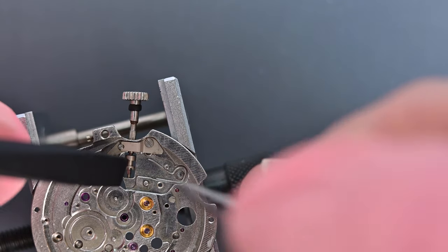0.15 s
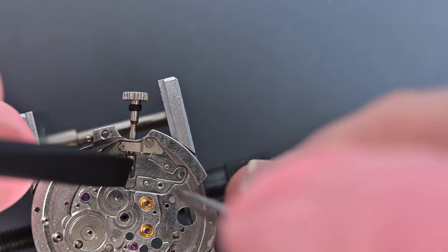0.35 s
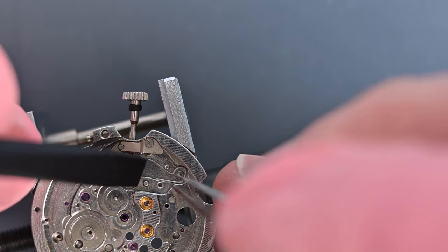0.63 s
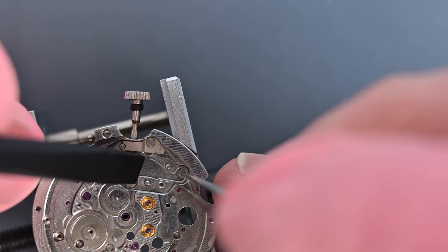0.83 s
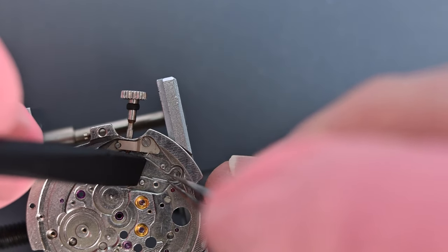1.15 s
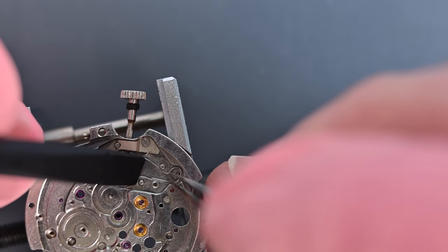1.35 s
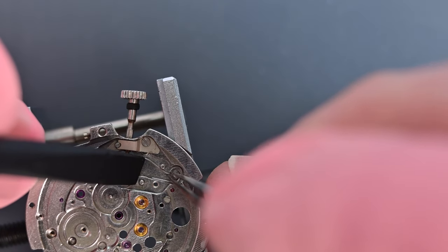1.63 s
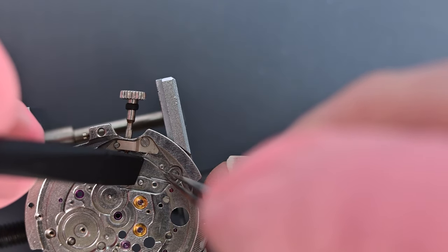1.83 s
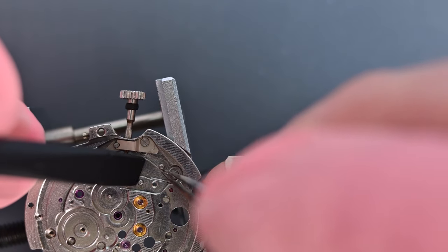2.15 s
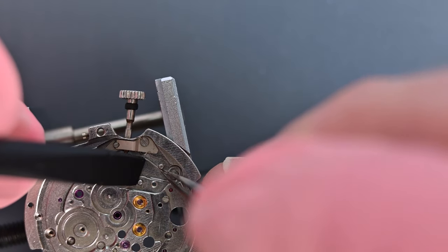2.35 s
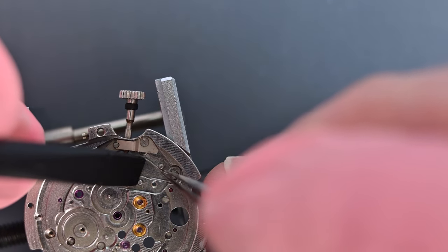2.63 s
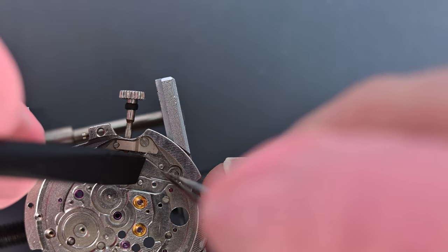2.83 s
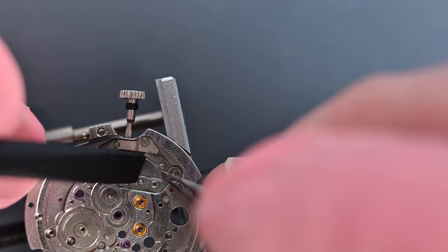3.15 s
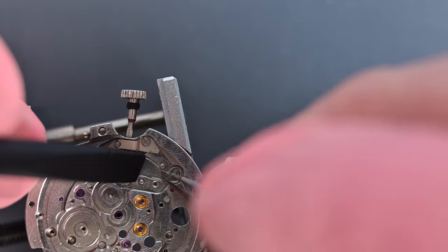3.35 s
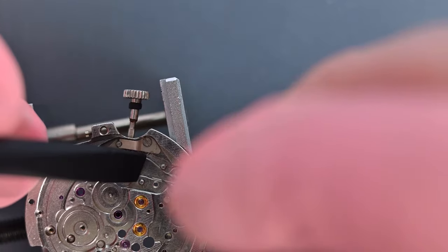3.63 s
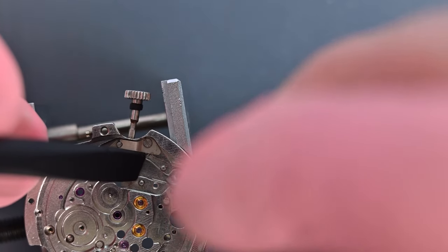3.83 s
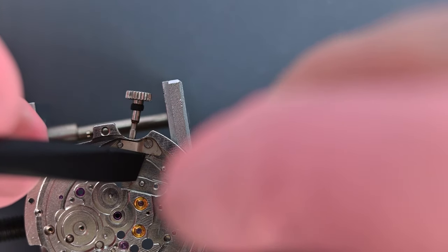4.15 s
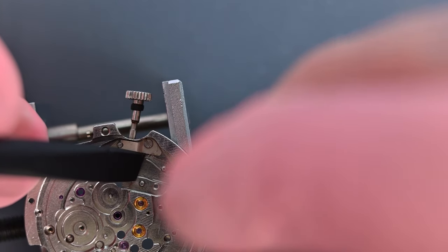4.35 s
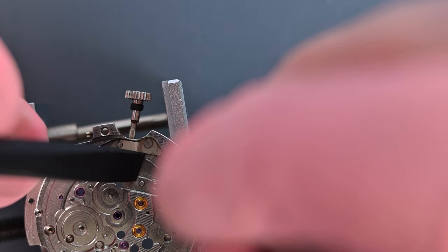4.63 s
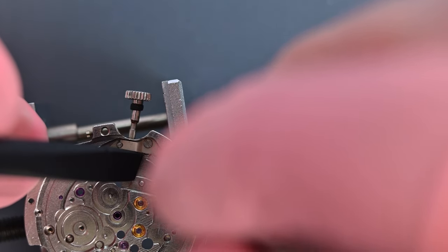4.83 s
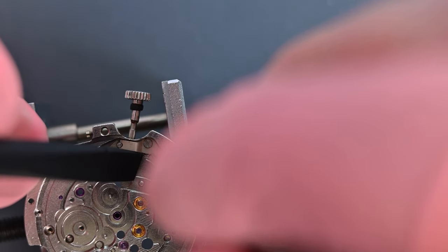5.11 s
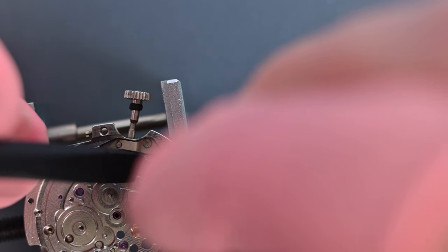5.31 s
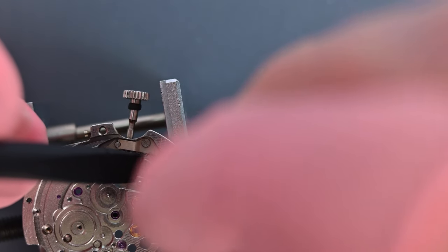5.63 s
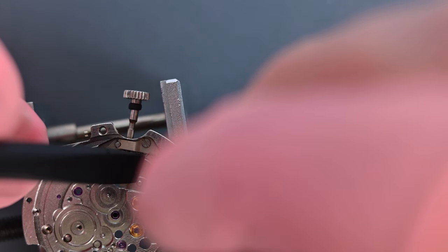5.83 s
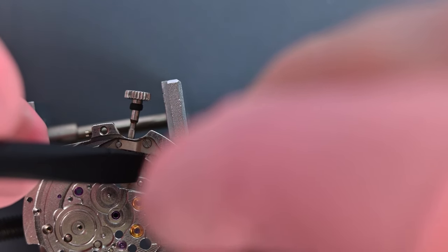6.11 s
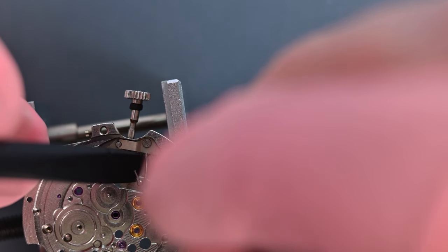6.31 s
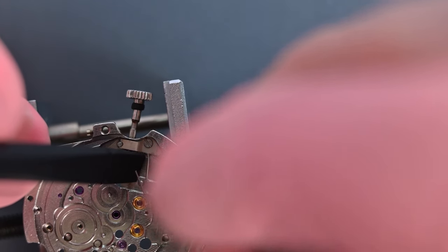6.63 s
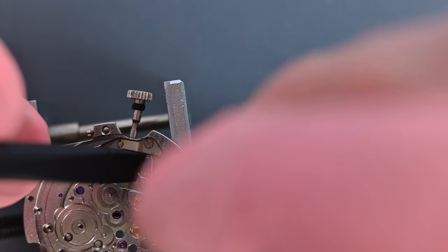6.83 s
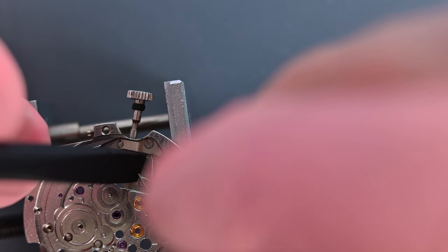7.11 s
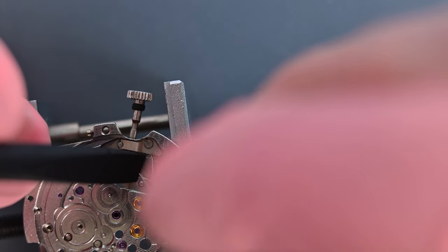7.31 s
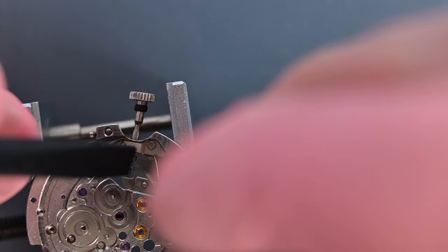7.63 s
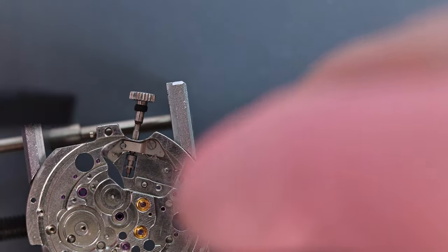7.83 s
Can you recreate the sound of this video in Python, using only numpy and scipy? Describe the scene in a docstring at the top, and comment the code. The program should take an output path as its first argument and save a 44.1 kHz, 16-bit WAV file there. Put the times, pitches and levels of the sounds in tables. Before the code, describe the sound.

Close stereo view of delicate watch work in a small quiet room. Thin steel ticks come first, then irregular soft knocks through the clamp and bench. A bright click lands just before three seconds, a short gritty scrape at three and a half, and the sharpest click past six. A distant low engine drone, room rumble and soft hiss continue throughout.

```python
"""Steel tweezers tick against the small metal parts of a watch movement clamped on a workbench.
Pushes knock dully through clamp and bench, and once the clamp scrapes along: struck modes and rubbed noise.
Fingers and tool rustle in shaped noise; the room answers with a decaying noise tail.
Behind lie a distant engine's drone (sines at shaft orders), room rumble and microphone hiss (shaped noise)."""
import sys
import numpy as np
from scipy import signal
from scipy.fft import rfft, irfft, next_fast_len
from scipy.io import wavfile
from scipy.ndimage import map_coordinates

SR = 44100
rng = np.random.default_rng(int(sys.argv[2]) if len(sys.argv) > 2 else 0)


def volts_from_db(level):
    """Convert decibel levels to linear amplitude ratios."""
    exponent = np.asarray(level, float) / 20
    return 10 ** exponent


def int16_out(signal):
    """Quantize to a 16-bit WAV file."""
    q = np.round(np.clip(np.atleast_2d(signal).T, -1, 1) * 32767)
    wavfile.write(sys.argv[1], SR, q.astype(np.int16))


N = 351036

# microphone hiss spectrum: freq_hz, relative_db_per_hz
HISS_SPECTRUM = [(180, -27), (300, -2.5), (584, -6), (689, -5.5), (762, -7.5), (1010, -8), (2140, -17),
                 (10900, -28), (15000, -27), (16000, -28)]
# room rumble spectrum: freq_hz, relative_db_per_hz
RUMBLE_SPECTRUM = [(12, -43), (20, -12), (60, -2), (134, -2), (173, -12), (214, -4.5), (235, -6),
                   (280, -19), (372, -17.5), (414, -26.5), (500, -25.5), (650, -60), (1100, -120)]
# left-right correlation of the noises: freq_hz, correlation (-1..1)
STEREO_LIKENESS = [(60, 0.84), (180, 0.95), (550, 0.69), (1650, 0.065), (4970, -0.16), (15000, -0.052)]
# distant engine: time_s, shaft_hz, shaft_tone_db, firing_tone_db, firing_octave_db
ENGINE_COURSE = [(0, 37.32, -52, -62.5, -64.5), (.82, 37, -46, -57, -61), (1.1, 36.74, -50.5, -56.5, -57.5),
                 (1.57, 36.14, -53.5, -50, -58), (2.3, 35.98, -49, -46, -59),
                 (2.8, 36.17, -57.5, -48, -51.5), (3.65, 35.43, -56, -48, -44),
                 (4.5, 34.53, -59.5, -43.5, -49.5), (4.8, 35.03, -65, -56, -44),
                 (4.95, 35.14, -54, -48.5, -60.5), (5.32, 35.5, -53.5, -47, -51),
                 (5.68, 36.2, -56.5, -43.5, -53), (5.9, 36.24, -55.5, -57.5, -59), (6.2, 37, -61, -49, -63),
                 (6.45, 37.1, -66, -50, -56), (6.66, 37.1, -65, -61, -63),
                 (6.83, 36.97, -58.5, -54.5, -57.5), (7.96, 38, -59, -62, -62.5)]
# shaft orders heard: multiple_of_shaft_hz
SHAFT_ORDERS = (1, 2, 3, 4, 6)
# slow independent wander of each order: waver_db
ORDER_WAVER_DB = (2.2, 1.5, 4.5, 1.5, 2.5)
# fingers and tool rubbing: time_s, level_db
RUSTLE_LEVEL = [(0.8, -78), (1.23, -66.5), (1.61, -78), (1.9, -81), (2.05, -70), (2.2, -85), (2.36, -67.5),
                (2.71, -94), (2.93, -72), (3.39, -68), (3.51, -51.5), (3.73, -64), (4.39, -75), (4.75, -64),
                (5.06, -79), (6.2, -70.5), (7.3, -94), (7.47, -71), (7.6, -86)]
# rubbing spectrum: freq_hz, relative_db_per_hz
RUB_SPECTRUM = [(300, -14), (500, 4), (1200, -7), (3000, -15.5), (7000, -26.5), (15000, -40)]
# clamp dragged over the bench: time_s, body_level_db
SCRAPE_LEVEL = [(3.41, -47), (3.452, -55), (3.47, -66), (3.516, -41), (3.622, -32.5), (3.678, -63),
                (3.71, -71)]
# grit rasp spectrum: freq_hz, relative_db_per_hz
GRIT_SPECTRUM = [(150, -36), (250, 1.5), (347, -11), (420, -39), (516, 10.5), (768, 2.5), (945, 8),
                 (1900, -18.5), (2490, -17.5), (3200, -26), (15500, -60)]
# clamp and bench modes: freq_hz, relative_db, t60_s, left_lead_rad, left_minus_right_db
CLAMP_MODES = [(514, -1, 0.015, -0.42, 8), (564, 2.5, 0.029, 0.34, -2), (678.5, 3.5, 0.02, 0.33, 0.5),
               (840, -6, 0.036, 0.68, 0.5), (926, 2, 0.016, -0.32, -0.5), (1001, -2.5, 0.017, 0.24, -1.5),
               (1115, -11, 0.024, 0.96, -13), (1248, -17.5, 0.03, -1.3, 1.5), (1560, 16.5, 0.011, -1, -8.5),
               (1900, 7, 0.019, 1, -6), (2333, 10, 0.016, -1.2, 1), (2630, -5.5, 0.015, -2.7, -22),
               (3256, 13, 0.0046, 1, -3.5), (4160, 19, 0.0017, 1, -3)]
# pushes felt by the clamp: start_s, lower_modes_peak_db, upper_re_lower_db
PUSHES = [(0.879, -38, -14.5), (0.934, -52.5, -8), (1.055, -50, -20), (1.078, -34, -11), (1.135, -45, -12),
          (1.189, -35, -20), (1.245, -46.5, -1.5), (1.28, -48, -3), (1.29, -32.5, -6), (1.362, -52.5, -11),
          (1.425, -48, -18), (1.593, -40, -13.5), (1.697, -46.5, -27), (1.78, -48.5, -25),
          (1.928, -54.5, -22), (2.014, -56.5, 0.5), (2.05, -51, -21), (2.108, -51, -13),
          (2.316, -49.5, 0.5), (2.338, -47.5, -17), (2.355, -49, -24), (2.39, -51, -18), (2.547, -44, -12),
          (2.844, -39.5, -9.5), (2.916, -46.5, -11), (2.965, -41, -20), (3.05, -47.5, -25),
          (3.129, -38, 0.5), (3.191, -38, -21), (3.216, -50, -17), (3.289, -36, -13), (3.347, -34.5, -17.5),
          (3.399, -47, -1.5), (3.415, -42.5, -25), (3.447, -34.5, -12.5), (3.495, -29.5, -31),
          (3.722, -45, -27), (3.779, -44, -11), (3.818, -48, -22), (3.916, -30.5, -17), (4.082, -40.5, -39),
          (4.172, -33, -21), (4.206, -45.5, -28), (4.306, -45, -18), (4.375, -30.5, -16),
          (4.404, -29.5, -13), (4.602, -33, -30), (4.651, -30, -13.5), (4.869, -48, -31), (5.115, -37, -21),
          (5.241, -51.5, -15), (5.369, -42, -2), (5.773, -42.5, -18), (5.979, -32.5, -10.5),
          (6.146, -41, -14), (6.237, -45.5, -2.5), (6.263, -48, -29), (6.442, -40.5, -19),
          (6.592, -43, -13), (6.685, -45, -34), (6.969, -46, -9), (7.242, -49, -18), (7.382, -34.5, -24),
          (7.458, -52.5, -28), (7.62, -39, -18), (7.751, -56.5, -2.5)]
# tweezers and plate modes: freq_hz, relative_db, t60_s, left_lead_rad, left_minus_right_db
STEEL_MODES = [(2300, -6, .012, 1, -1), (3850, -7, .009, .8, 6), (4190, -4, .014, .4, 1),
               (4800, -7, .007, 0, 0), (5500, -3, .008, .2, 2), (5900, 0, .012, 0, 0),
               (7000, -12, .006, .3, 0), (7900, -6, .01, 1.2, -2), (8450, -1, .01, 1.3, -3),
               (8800, -3, .012, 1.6, -3), (10400, -6, .007, 2.7, -4), (11550, 0, .014, 3.7, 0),
               (13600, -10, .008, 2.4, 2), (14300, -5, .012, 2.6, 3), (14850, -3, .01, 2.6, 1),
               (15400, 1, .01, 2.8, -1)]
# steel on steel: start_s, middle_modes_peak_db, lower_re_middle_db, highest_re_middle_db
TOUCHES = [(0.0034, -51.5, 6, 9), (0.3085, -55.5, -11, -9), (0.4499, -56.5, -5.5, -13), (0.492, -66, 3, 10),
           (0.673, -61, -5, -13), (1.1362, -63, 1, 4), (1.2456, -64, -11, -9), (1.2896, -67, -8, -11),
           (1.413, -65, -3, 6), (1.592, -65, -6, -1), (2.8435, -40, 6, 6), (3.12, -62, -8, -5),
           (3.1289, -50, -15, -6), (3.715, -65, 1, -9), (3.788, -60.5, -1, 11), (3.8187, -64, 7, 6),
           (3.916, -65, -5, -6), (4.374, -66, 6, -8), (4.4061, -57.5, -2, -11), (4.6002, -59, 9, 6),
           (4.6029, -53, 3, -6), (4.615, -67, 9, -3), (5.0918, -69, 10, -4), (5.3664, -61, 7.5, -10),
           (5.3765, -67, 7, 0), (5.9793, -67, 2, -3), (6.2364, -31, 4, -1), (6.2454, -58, -21, -3),
           (6.58, -66, -10.5, 1), (7.7462, -56, -1, 1), (7.754, -63, 9, 0), (7.7585, -46.5, -5, 5),
           (7.761, -52.5, 14, 3)]
# room decay: freq_hz, t60_s
ROOM_DECAY = [(300, 0.11), (2000, 0.32), (15000, 0.42)]

CLAMP_SPLIT_HZ = 1500  # lower modes below, upper modes above
SILENT_DB = -120


def unit(x):
    """Scaled to rms 1."""
    return x / np.sqrt(np.mean(x ** 2) + 1e-20)


def along(points, hz):
    """Interpolates (Hz, value) points on a log frequency axis."""
    f, v = np.transpose(points)
    return np.interp(np.log(hz + 1), np.log(f + 1), v)


def curves(rows, outside=None):
    """One value per sample for each column after the time."""
    time_s, *columns = np.transpose(rows)
    t = np.arange(N) / SR
    return [np.interp(t, time_s, column, outside, outside) for column in columns]


def swell(db):
    """A level curve about its mean."""
    return db - db.mean()


def wobble(knots_per_s):
    """Smooth random curve drawn from normal-distributed knots."""
    knots = rng.standard_normal(int(N * knots_per_s / SR) + 4)
    return map_coordinates(knots, [np.arange(N) * knots_per_s / SR])


def filtered(x, response):
    """x times a response of frequency, zero-padded."""
    m = next_fast_len(x.shape[-1] + 8192)
    spectrum = rfft(x, m) * response(np.fft.rfftfreq(m, 1 / SR))
    return irfft(spectrum, m)[..., :x.shape[-1]]


def rush(spectrum):
    """Stereo noise of rms 1; the mid/side balance sets the left-right correlation at each frequency."""
    def mid_side_response(hz):
        angle = np.arccos(np.clip(along(STEREO_LIKENESS, hz), -1, 1)) / 2
        return volts_from_db(along(spectrum, hz)) * [np.cos(angle), np.sin(angle)]

    mid, side = filtered(rng.standard_normal((2, N)), mid_side_response)
    return unit(np.array([mid + side, mid - side]))


def ringing(modes, lo_hz, hi_hz):
    """Decaying modes of one band at the two ports, each with a random strength and starting phase."""
    band = [mode for mode in modes if lo_hz <= mode[0] < hi_hz]
    hz, db, t60_s, lead_rad, pan_db = np.transpose(band)[:, :, None]
    t = np.arange(SR // 10) / SR
    port = np.array([.5, -.5])[:, None, None]  # left, right
    db = db + 2.5 * rng.standard_normal(hz.shape)
    start_cycles = 0.3 * rng.standard_normal(hz.shape)
    phase = 2 * np.pi * (hz * t + start_cycles) + port * lead_rad
    decay = volts_from_db(db + port * pan_db - 60 * t / np.abs(t60_s))
    onset = 1 - np.exp(-t * hz)
    return np.sum(decay * np.sin(phase) * onset, 1)


def contact(decay_s, chatter):
    """Rough contact: a one-sample first touch, with exponentially dying noise chatter."""
    t = np.arange(SR // 40) / SR
    return (t == 0) + chatter * rng.standard_normal(len(t)) * np.exp(-t / decay_s)


def add(track, start_s, touch, ring, peak_db):
    """Convolves a contact with a body's ring; adds it at a peak level of the left-right mean."""
    sound = signal.fftconvolve(touch[None], ring, axes=1)
    gain = volts_from_db(peak_db) / np.abs(sound.mean(0)).max()
    part = track[:, round(start_s * SR):][:, :sound.shape[1]]
    part += (gain * sound)[:, :part.shape[1]]


def hiss():
    """Microphone hiss: steady shaped noise."""
    return volts_from_db(-67) * rush(HISS_SPECTRUM)


def rumble():
    """Room rumble: low noise that partly follows the firing tone's swell and wavers slowly."""
    mean_db, firing_share = -53.5, 0.22
    firing_db = curves(ENGINE_COURSE)[2]
    level_db = mean_db + firing_share * swell(firing_db) + 1.192 * wobble(2.864)
    return volts_from_db(level_db) * rush(RUMBLE_SPECTRUM)


def engine():
    """Sines at shaft orders; two borrow swell from the three main tones; each wavers and trembles alone."""
    waver_per_s, tremble_db, tremble_per_s = 5, 1.14, 11
    shaft_hz, *tones_db = curves(ENGINE_COURSE)
    shaft_rad = 2 * np.pi * np.cumsum(shaft_hz) / SR

    def borrowed(mean_db, *shares):
        return mean_db + sum(share * swell(tone) for share, tone in zip(shares, tones_db))

    def order_tone(order, level_db, waver_db):
        level_db = level_db + waver_db * wobble(waver_per_s) + tremble_db * wobble(tremble_per_s)
        phase = order * shaft_rad + 0.27 * wobble(6) + 2 * np.pi * rng.random()
        return volts_from_db(level_db) * np.sin(phase)

    shaft_db, firing_db, octave_db = tones_db
    # mean dB, then shares of the shaft, firing and octave swells
    third_db = borrowed(-63.5, 0.75, 0.3, 0.06)
    sixth_db = borrowed(-58, 0.57, -0.17, 0.68)
    levels_db = shaft_db, firing_db, third_db, octave_db, sixth_db
    drone = np.sqrt(2) * sum(map(order_tone, SHAFT_ORDERS, levels_db, ORDER_WAVER_DB))
    return drone * volts_from_db([[-.2], [.2]])  # left, right dB


def rustle():
    """Skin and steel rub in short clumps: shaped noise under a wavering level curve."""
    level_db = curves(RUSTLE_LEVEL, outside=SILENT_DB)[0]
    return volts_from_db(level_db + 2.5 * wobble(40)) * rush(RUB_SPECTRUM)


def scrape():
    """Dense uneven slips under each foot shake the clamp's lower modes; grit rasps broadly around them."""
    feet, grit_re_body_db = 4, 1
    level_db, = curves(SCRAPE_LEVEL, outside=SILENT_DB)
    slips = rng.standard_normal((feet, N)) * volts_from_db(3 * wobble(120))
    body = np.zeros((2, N))
    for foot in slips:
        ring = ringing(CLAMP_MODES, 0, CLAMP_SPLIT_HZ)
        body += signal.fftconvolve(foot[None], ring, axes=1)[:, :N]
    # a little opposite-sign noise widens the grit
    rough = slips[0] + [[.15], [-.15]] * rng.standard_normal(N)
    grit = filtered(rough, lambda hz: volts_from_db(along(GRIT_SPECTRUM, hz)))
    return volts_from_db(level_db) * (unit(body) + volts_from_db(grit_re_body_db) * unit(grit))


def knocks():
    """Pushes ring the clamp, each with its own share of upper modes; faint nudges fall at random."""
    track = np.zeros((2, N))
    nudges = [(rng.uniform(.8, 7.9), rng.normal(-56, 1.5), -18) for _ in range(10)]
    for start_s, peak_db, upper_db in PUSHES + nudges:
        touch = contact(.0084, .05)
        add(track, start_s, touch, ringing(CLAMP_MODES, 0, CLAMP_SPLIT_HZ), peak_db)
        add(track, start_s, touch, ringing(CLAMP_MODES, CLAMP_SPLIT_HZ, SR), peak_db + upper_db)
    return track


def ticks():
    """Each touch is a brief steel ring and a crack of noise, its mode bands weighted by where it lands."""
    lower_hz, tip_hz = 6500, 12500
    track = np.zeros((2, N))
    # bright edge, one sample later at the right port
    snap = np.array([[1, -1, 0], [0, 1, -1]])
    # faint touches of the tips at random moments
    grazes = [(rng.random() * N / SR, -73, *rng.normal(-7, 3.7, size=2)) for _ in range(12)]
    for start_s, peak_db, body_db, tip_db in TOUCHES + grazes:
        touch = contact(.0013, .25)
        add(track, start_s, touch, ringing(STEEL_MODES, 0, lower_hz), peak_db + body_db)
        add(track, start_s, touch, ringing(STEEL_MODES, lower_hz, tip_hz), peak_db)
        add(track, start_s, touch, ringing(STEEL_MODES, tip_hz, SR), peak_db + tip_db)
        add(track, start_s, contact(.0052, .24), snap, peak_db)
    return track


def walls(x):
    """Room answer: a delayed noise tail in which each frequency dies at its own speed."""
    hz, t, z = signal.stft(rng.standard_normal((2, SR // 3)), SR, nperseg=256)
    decay = volts_from_db(-60 * t / along(ROOM_DECAY, hz)[:, None])
    tail = signal.istft(z * decay, SR, nperseg=256)[1]
    delayed = np.pad(x, ((0, 0), (300, 0)))  # samples
    return signal.fftconvolve(delayed, tail / np.linalg.norm(tail[0]), axes=1)[:, :N]


def scene():
    """Near work with its echo over engine, rumble and hiss."""
    background = hiss() + rumble() + engine()
    dull = scrape() + knocks()
    bright = ticks()
    echo = walls(volts_from_db(-17.5) * dull + volts_from_db(-33) * bright)
    return background + rustle() + echo + dull + bright


def band_limit(x):
    """A steep low-pass at the top of the band."""
    return signal.sosfilt(signal.butter(12, 16730, fs=SR, output="sos"), x)


def record(dry):
    """Steep low-pass: little remains above the band limit."""
    top_hz = 15900
    mix = filtered(dry, lambda hz: 1 / (1 + (hz / top_hz) ** 80))
    return band_limit(mix)


dry = scene()
out = record(dry)
int16_out(out)
```